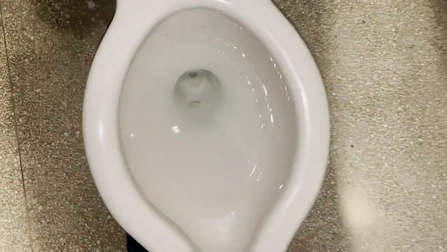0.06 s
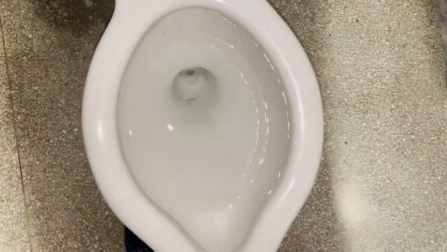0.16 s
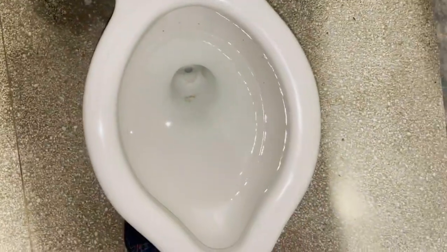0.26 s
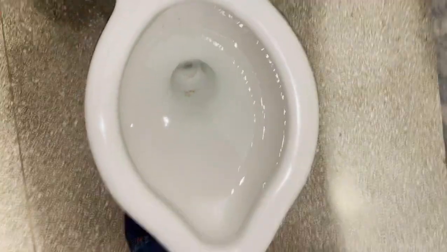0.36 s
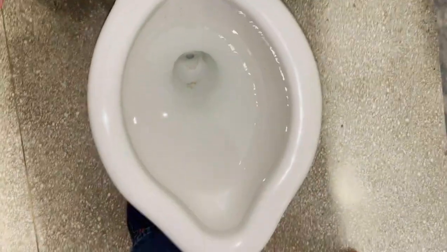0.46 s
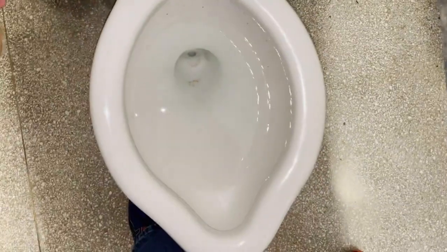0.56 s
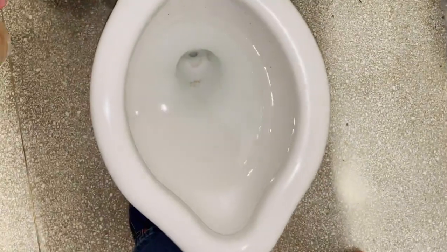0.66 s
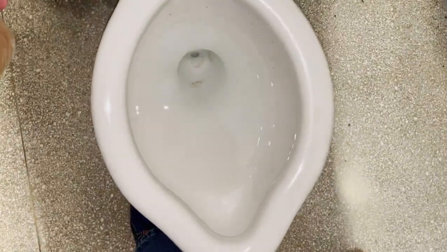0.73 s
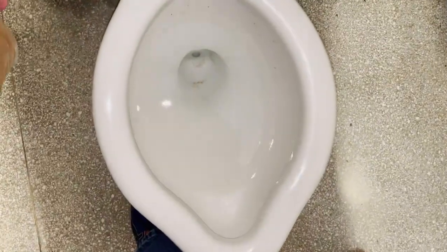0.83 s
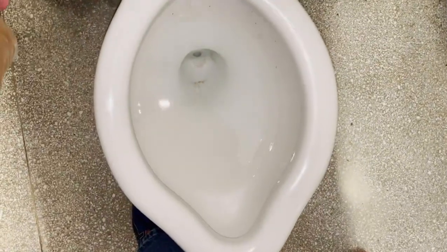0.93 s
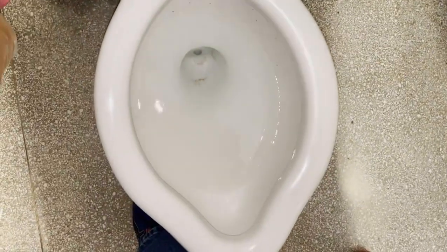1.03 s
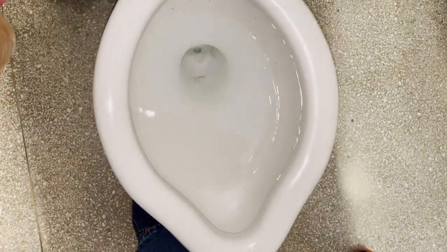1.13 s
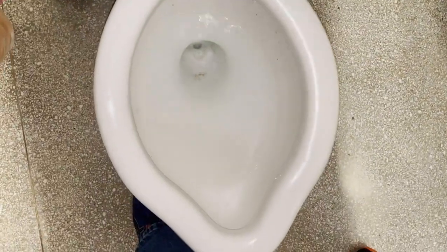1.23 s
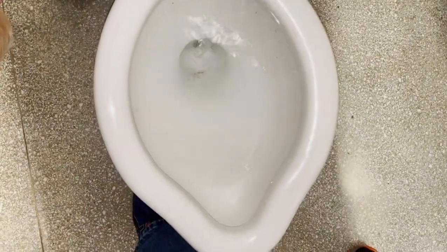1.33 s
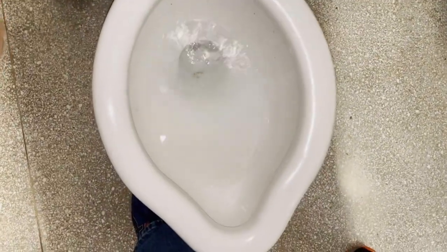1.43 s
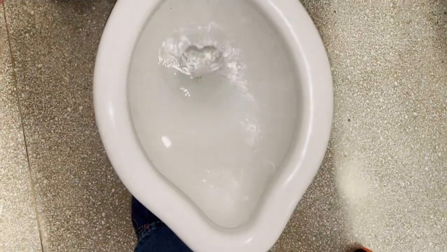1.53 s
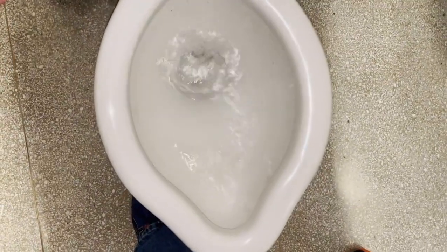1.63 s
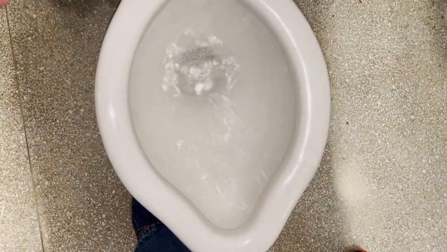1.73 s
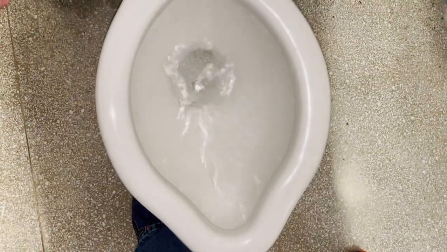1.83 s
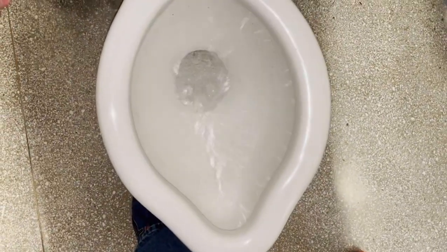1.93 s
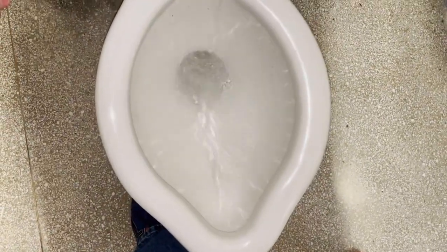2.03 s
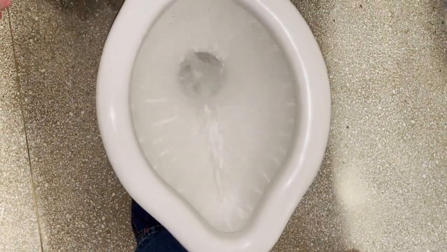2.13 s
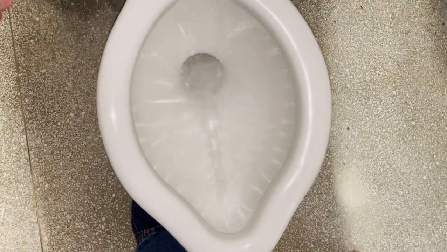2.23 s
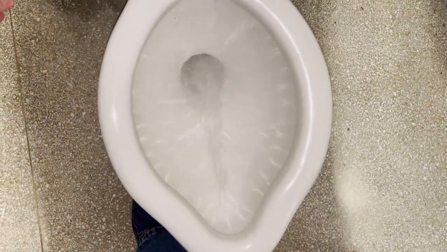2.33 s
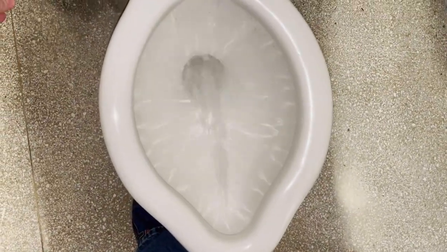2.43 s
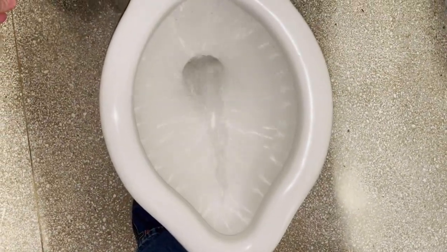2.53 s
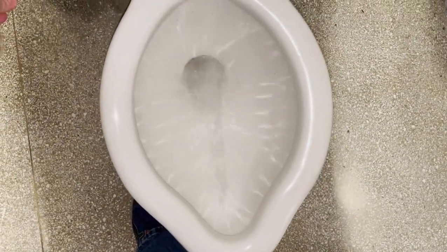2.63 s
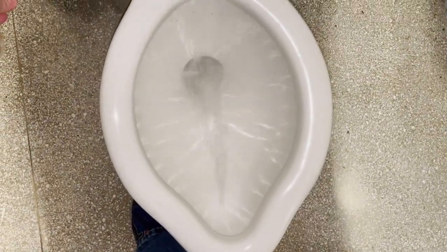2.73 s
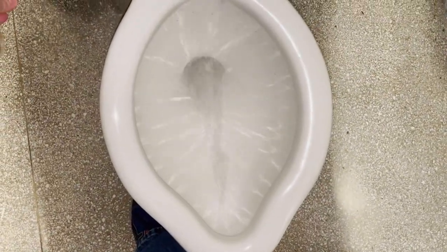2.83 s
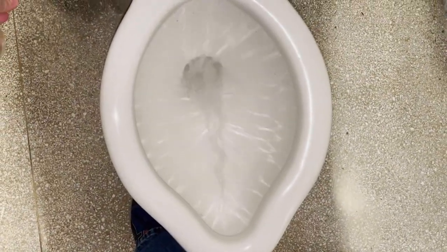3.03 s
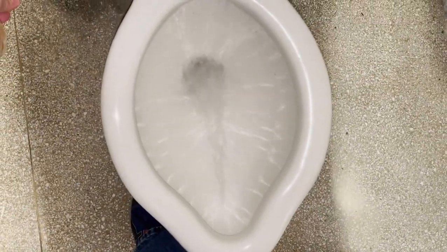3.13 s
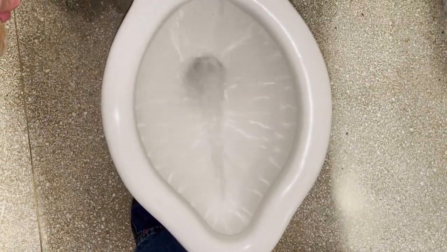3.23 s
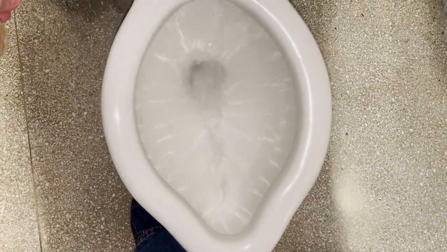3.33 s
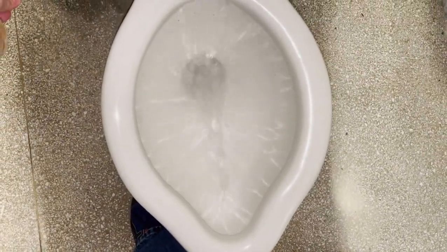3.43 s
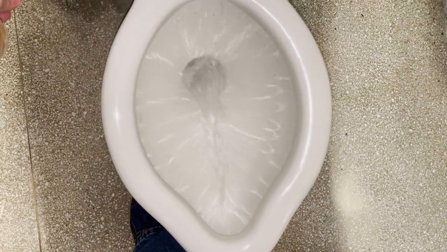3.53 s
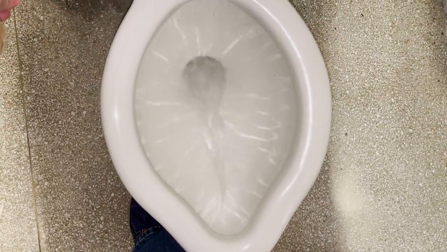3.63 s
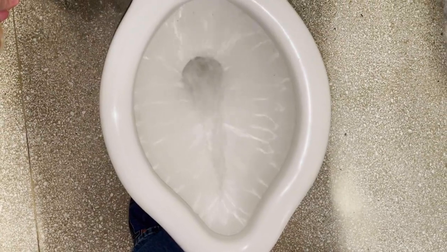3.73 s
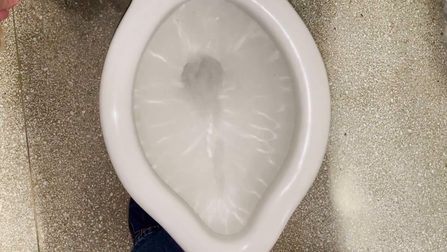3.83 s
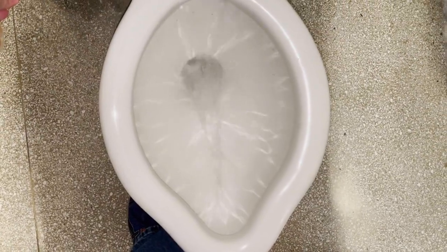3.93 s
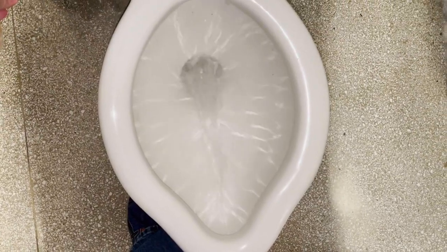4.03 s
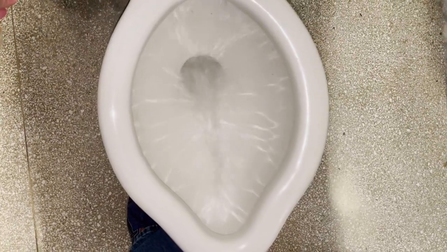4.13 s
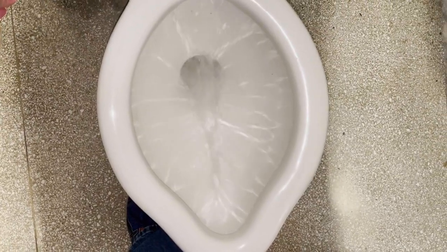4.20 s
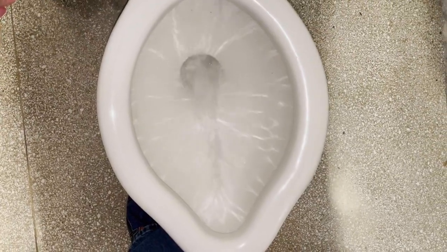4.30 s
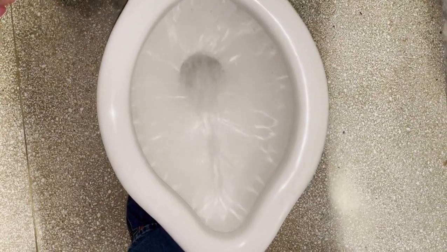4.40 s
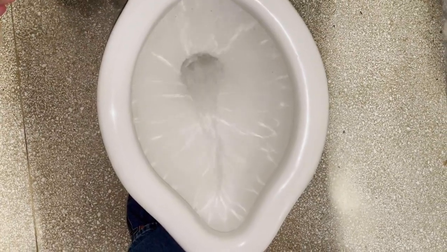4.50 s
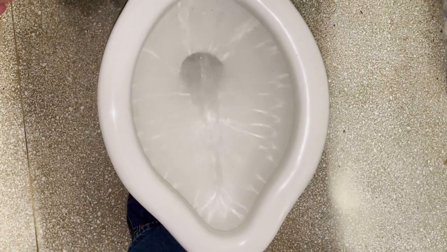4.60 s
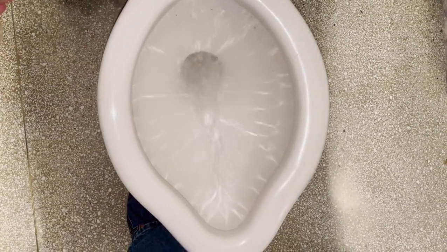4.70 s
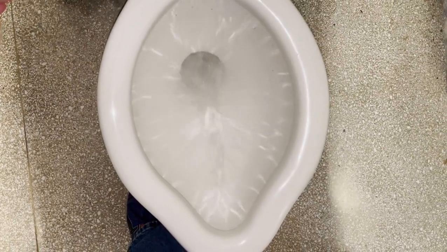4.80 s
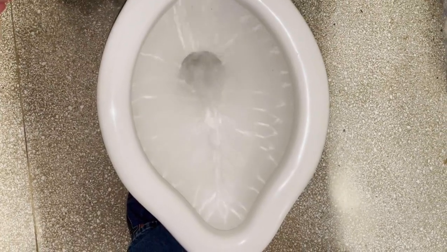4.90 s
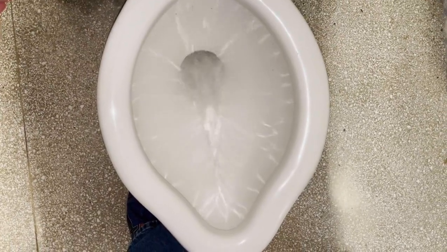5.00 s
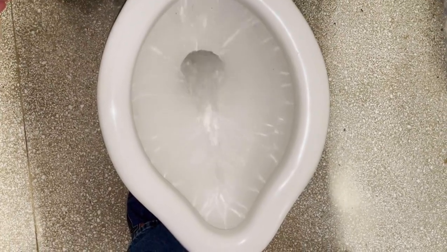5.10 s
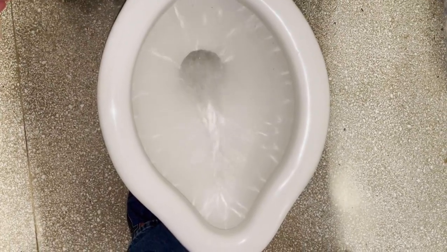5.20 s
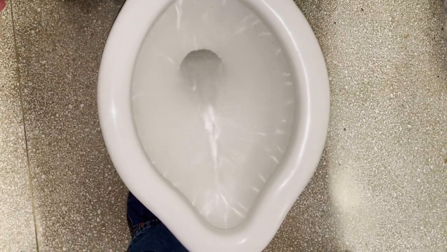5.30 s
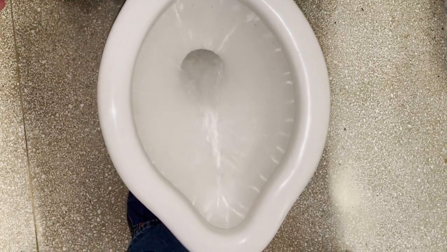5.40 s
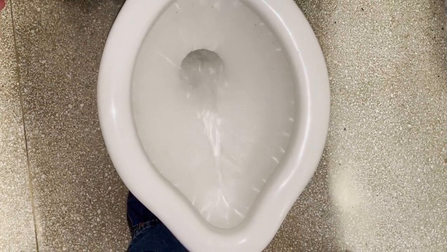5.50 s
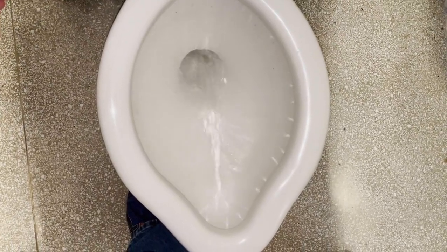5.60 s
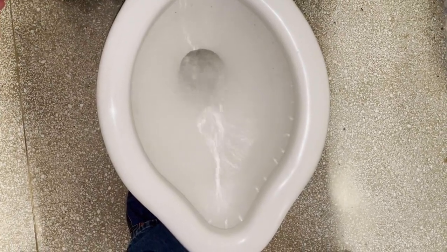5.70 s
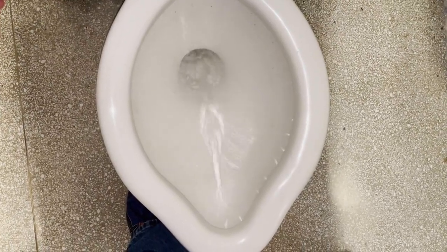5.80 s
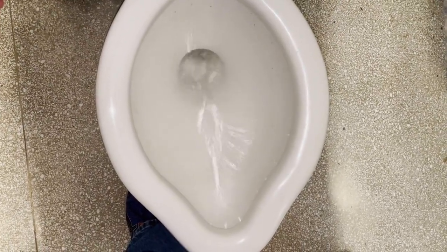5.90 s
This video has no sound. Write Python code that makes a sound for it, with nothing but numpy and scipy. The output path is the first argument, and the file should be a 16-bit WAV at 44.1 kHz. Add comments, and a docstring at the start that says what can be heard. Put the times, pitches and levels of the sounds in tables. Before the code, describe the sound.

Stereo pickup just over the bowl, with short, bright tiled reflections. Quiet air noise and soft knocking come first, then an abrupt roaring flush under a second in. Deep glugs, higher-pitched slurps and crackling spray peak around the middle, then ease into weaker gurgles and trickling as the valve closes.

```python
"""A pressure-fed toilet flushes in a small tiled restroom, heard from just above the bowl.
The siphon gurgles as damped bubbles ring the trap and bowl; its pitch climbs as the bowl empties, then sinks.
Air thumps as gliding tones, a faint narrow-band hiss fades, the valve opens with a hiss of shaped noise,
and the jet bursts into the bowl, a boom of resonant noise. Rim water splashes on the porcelain
as clouds of short bubbles and noise, then eases off. Faint ventilation noise lies under it all."""
import sys
import numpy as np
from scipy import signal
from scipy.fft import rfft, irfft, next_fast_len
from scipy.io import wavfile
from scipy.ndimage import map_coordinates

SR = 44100
rng = np.random.default_rng(int(sys.argv[2]) if len(sys.argv) > 2 else 0)


def pcm_store(signal):
    """Save signal as 16-bit PCM."""
    levels = np.round(np.clip(np.atleast_2d(signal), -1, 1) * 32767)
    wavfile.write(sys.argv[1], SR, levels.astype(np.int16).T)


N = 262395

# churn in the trap, slurp in the bowl: start_s, churn_db, slurp_db, typical bubble pitch_hz
SIPHON_COURSE = [(0.65, -44.5, -46, 434), (0.82, -48, -40, 394), (0.87, -28.5, -31.5, 376),
                 (1.45, -29.5, -34, 360), (1.8, -26, -30.5, 427), (2.15, -24.5, -24.5, 440),
                 (2.65, -25, -22.5, 548), (3.5, -31.5, -26.5, 590), (4.22, -31, -25.5, 760),
                 (4.42, -35, -31, 800), (5.15, -34.5, -33.5, 635), (5.95, -34, -43.5, 518)]
# resonances of the bowl: centre_hz, width_hz, level_db
BOWL_MODES = [(419, 73, -4), (444.4, 23.5, 3.5), (508, 31, -3.5), (555.7, 35, -1), (633.5, 78, -1.5),
              (722, 48, -2.5), (811, 93, -2), (880, 91, -19)]
# the valve cracks open, lets the jet burst through, then throttles down over CLOSING_S
OPEN_S, BURST_S, CLOSE_S, CLOSING_S = 0.62, 0.845, 5.49, 0.13
TOP_HZ = 15850  # upper band limit


def amp(db):
    """Decibels to gain."""
    return 10 ** (np.asarray(db) / 20)


def unit(x):
    """Scale to rms 1."""
    return x / np.sqrt(np.mean(x ** 2) + 1e-20)


def along(points, hz):
    """Interpolation on a logarithmic frequency axis through (frequency, value) points."""
    f, v = np.transpose(points)
    return np.interp(np.log(hz + 1), np.log(f + 1), v)


def curves(rows):
    """Linear interpolation in time: one value per sample for each column after the first."""
    s, *cols = np.transpose(rows)
    return [np.interp(np.arange(N) / SR, s, c) for c in cols]


def wobble(rate):
    """A smooth random modulation, interpolated through rate random knots a second."""
    knots = rng.standard_normal(int(N * rate / SR) + 4)
    return map_coordinates(knots, [np.arange(N) * rate / SR])


def since(s):
    """Seconds since time s, 0 before it."""
    return np.maximum(np.arange(N) / SR - s, 0)


def opened(start, rise):
    """A linear onset: 0 until start, then up to 1 over rise seconds."""
    return np.minimum(since(start) / rise, 1)


def surge(s, rise, decay):
    """A transient: a quick rise at time s, then exponential decay."""
    return opened(s, rise) * np.exp(-since(s + rise) / decay)


def add(track, s, sound):
    """Superposition: mix a sound into the track at time s."""
    start = max(round(s * SR), 0)
    track[start:start + len(sound)] += sound[:max(N - start, 0)]


def filtered(x, response):
    """Linear filtering: the spectrum of x times a complex response of frequency."""
    m = next_fast_len(N + SR // 2)
    return irfft(rfft(x, m) * response(np.fft.rfftfreq(m, 1 / SR)), m)[..., :N]


def coloured(x, spectrum):
    """Spectral shaping: x through the given spectrum, at rms 1."""
    return unit(filtered(x, lambda hz: amp(along(spectrum, hz))))


def resonate(x, modes, edge_hz):
    """Modal resonance: x through parallel damped modes, falling off above edge_hz, at rms 1."""
    def body(f):
        total = 0
        for k, (centre, width, db) in enumerate(modes):
            loss = 1j * f * width
            # neighbouring modes have opposite signs
            total = total + (-1) ** k * amp(db) * loss / (centre * centre - f * f + loss)
        return total
    damping = signal.butter(3, edge_hz, fs=SR, output="sos")
    return unit(signal.sosfilt(damping, filtered(x, body)))


def ring(t, hz, t60, glide, attack):
    """Damped oscillation of an air pocket whose pitch rises by the share glide over its t60."""
    life = t / t60
    tone = np.sin(2 * np.pi * hz * t * (1 + glide * np.minimum(life, 1) / 2))
    return tone * np.exp(-np.log(1000) * life) * (1 - np.exp(-t / attack))


def bubbles(count, pitch_hz, pitch_spread, cycles, size_db, glide, size):
    """Bubble acoustics: ringing pockets at random times, many weak and few strong, at rms 1."""
    chance = rng.random((count, 2))
    start = (chance[:, :1] * N).astype(int)
    detune = np.exp(pitch_spread * rng.standard_normal((count, 1)))
    hz = np.broadcast_to(pitch_hz, N)[start] * detune
    strength = amp(size_db * np.minimum(-np.log(1 - chance[:, 1:]), np.pi))
    k = np.arange(size)
    # each bubble lasts a fixed number of its own cycles, so high ones die sooner
    grains = strength * ring(k / SR, hz, cycles / hz, glide, .5 / hz)
    return unit(np.bincount((start + k).ravel(), grains.ravel(), N)[:N])


def porcelain(x):
    """Cavity resonance: x coloured by the upper resonances of the bowl, at rms 1."""
    # centre_hz, half_width_hz, boost_db
    cavity = [(1740, 30, 0.5), (2395, 37, -1), (2690, 46, 0.5), (2840, 90, 1), (3600, 89, 1.5),
              (3810, 140, 3.5), (4150, 92, 2.5), (4500, 58, -1), (5150, 180, 2.5), (6000, 130, 5),
              (6900, 180, 2), (7370, 110, 6.5), (8010, 120, 10.5)]

    def boost(f):
        return amp(sum(db * np.exp(-((f - hz) / width) ** 2) for hz, width, db in cavity))
    return unit(filtered(x, boost))


def around_bowl(x, side_db):
    """Partial decorrelation: drops land all round the bowl, so a part of x differs between channels."""
    side = amp(side_db) * np.roll(x, N // 2)
    return unit(x + np.array([[1], [-1]]) * side)


def swayed(x):
    """Frequency modulation by a moving boundary: the heaving water shifts the resonances in x."""
    sway_share, sway_per_s = .05, 7
    position = np.cumsum(1 + sway_share * wobble(sway_per_s))
    return map_coordinates(x, [position], order=1, mode="mirror")


def ventilation():
    """Broadband flow noise: random noise with a mostly low spectrum."""
    # spectrum of the ventilation: pitch_hz, level_db
    vent_spectrum = [(25, 2), (55, 0), (90, 5), (160, -11.5), (350, -11), (500, -18), (780, -21),
                     (1250, -26), (1600, -35), (2500, -31.5), (3400, -41), (5600, -42), (15000, -48)]
    return amp(-42.5) * coloured(rng.standard_normal(N), vent_spectrum)


def room_tail():
    """Diffuse reverberation: decaying noise, each band at its own rate, different in each channel."""
    # decay time per band: pitch_hz, t60_s
    decay_times = [(100, 0.13), (500, 0.54), (3000, 0.83), (14000, 0.022)]
    # level of the part that differs between channels; top treble is the same in both: pitch_hz, level_db
    differing_levels = [(80, -9), (300, -9.5), (600, -1), (1200, 0), (3000, -1), (5000, -6), (6500, 1),
                        (8600, -14.5), (12000, -2.5), (12900, 1.5), (13400, -50)]
    hz, t, z = signal.stft(rng.standard_normal((2, SR // 3)), SR, nperseg=256)
    early = amp(7.0) * np.exp(-t / 0.0027)
    decay = amp(-60 * t / along(decay_times, hz)[:, None]) + early
    decay = decay / np.sqrt(np.mean(decay ** 2, axis=1, keepdims=True))
    z = z * decay * amp(along(differing_levels, hz))[:, None]
    tail = signal.istft(z, SR, nperseg=256)[1] / np.sqrt(SR // 3)
    return np.pad(tail, ((0, 0), (SR // 500, 0)))  # starts 2 ms late


def room(x, size=4096):
    """Time-varying reverberation: the water keeps moving, so echo paths partly last, partly renew."""
    lasting = signal.fftconvolve(x[None], room_tail(), axes=1)[:, :N]
    moving = np.zeros((2, N + 2 * SR))
    padded = np.pad(x, (size, 2 * size))
    fade = np.sin(np.pi * np.arange(2 * size) / (2 * size))
    # overlapping pieces, each answered by a new tail
    for start in range(0, N + size, size):
        piece = padded[None, start:start + 2 * size] * fade
        answer = signal.fftconvolve(piece, room_tail(), axes=1)
        moving[:, start:start + answer.shape[1]] += answer
    return .25 * lasting + .97 * moving[:, size:size + N]


def early_hiss():
    """Narrow-band noise: a faint hiss at the start, which fades after 0.34 s."""
    # bands of the early hiss: centre_hz, width_hz, level_db
    early_modes = [(2160, 330, -4), (4770, 470, -5)]
    start_db, fade_start_s, fade_db_per_s = -62.5, 0.34, 107
    level = amp(start_db - fade_db_per_s * since(fade_start_s))
    return level * resonate(rng.standard_normal(N), early_modes, edge_hz=6500)


def air_thumps():
    """Pressure pulses: air in the pipe, and later gulps of the siphon, make dull thuds that drop in pitch."""
    # start_s, relative level_db, nominal pitch_hz (the glide runs from above it to below it)
    thumps = [(0.197, -24, 89), (0.241, -27, 105), (0.293, -26, 127), (0.309, -29, 170), (0.317, -25, 57),
              (0.345, -23, 90), (0.37, -18.5, 124.5), (0.385, -16, 75), (0.421, -14.5, 107),
              (0.446, -13.5, 138), (0.483, -13.5, 74.5), (0.52, -21, 78), (0.555, -13.5, 114),
              (0.625, -30, 115), (0.654, -23, 128), (0.677, -18.5, 91), (0.722, -21, 138), (0.74, -16, 82),
              (0.765, -16, 88), (0.797, -16, 125), (0.811, -15.5, 145), (1.865, -18, 80),
              (2.095, -17.5, 85), (2.184, -23, 78), (2.248, -12.5, 93), (2.406, -10.5, 94),
              (2.533, -17, 80), (2.609, -12.5, 100), (2.656, -13, 66)]
    out, t = np.zeros(N), np.arange(SR // 4) / SR
    for s, db, hz in thumps:
        drop_s = 0.0065 * np.exp(0.19 * rng.standard_normal())
        pitch_hz = hz * (0.54 + 1.77 * np.exp(-t / drop_s))
        swell = (1 - np.exp(-t / 0.0067)) * np.exp(-t / 0.01)
        add(out, s, amp(db + 7.5) * swell * np.sin(2 * np.pi * np.cumsum(pitch_hz) / SR))
    judder_db = wobble(300)
    return out * amp(judder_db)


def flow_db():
    """Throttling: the flow steps up in stages, holds, and drops as the valve narrows."""
    # the stages of opening: start_s, flow level_db
    opening = [(0.63, -16.5), (0.725, -13), (0.74, -8), (0.825, -7.5), (0.845, -3.5), (1.05, 2)]
    throttled_db = -5.5  # last flow relative to the held flow
    return curves(opening)[0] + throttled_db * opened(CLOSE_S, CLOSING_S)


def valve_ring():
    """Flow-excited resonance: the valve body rings in the flow, most while the opening is narrow."""
    # resonances of the valve body: centre_hz, width_hz, level_db
    body_modes = [(2240, 240, 2), (3830, 180, -2), (4190, 210, 8.5), (4470, 280, 10), (5180, 530, 4.5)]
    ring_db, wide_open_db = -35, -31  # narrow opening; its loss when wide open
    stroke = np.sin(np.pi * opened(BURST_S, CLOSE_S + CLOSING_S - BURST_S))
    running = opened(start=0.8, rise=0.17) * amp(ring_db + 1.1 * flow_db() + wide_open_db * stroke)
    return running * resonate(rng.standard_normal(N), body_modes, edge_hz=9600)


def valve():
    """Turbulence noise: water under pressure hisses through the valve and spits from the rim holes."""
    # spectrum of the hiss: pitch_hz, level_db
    hiss_spectrum = [(300, -2.5), (1500, -4.5), (2400, -5), (3200, -4), (4500, -0.5), (5650, -11.5),
                     (6500, -3.5), (8600, -2), (10500, -0.5), (13000, -4.5), (14500, -2.5), (15800, -12)]
    hiss_db = -32.5  # at a flow of 0 dB
    spits = rng.standard_normal(N) * amp(1.6 * wobble(700))
    hiss = porcelain(coloured(spits, hiss_spectrum))
    return amp(hiss_db + flow_db() + 0.32 * wobble(22.08)) * hiss


def drain():
    """Column resonance: the drain rumbles and lurches; the jet booms and briefly stifles the rumble."""
    # resonances of the drain: centre_hz, width_hz, level_db
    drain_modes = [(58, 27, -10), (83, 11.8, 6.5), (94.6, 20.4, -2), (140, 18, -5.5)]
    # resonances of the filled bowl: centre_hz, width_hz, level_db
    full_bowl_modes = [(149.6, 10, 2), (203, 35, -2), (368, 30, -3.5)]
    # the water column lurches: peak_s, level_db
    lurch_times = [(0.77, -21), (0.92, -40), (1.04, -23.5), (1.17, -28.5), (1.27, -32), (3.08, -35),
                   (4.53, -32), (4.78, -34)]
    lurch_width_s, rumble_db, boom_db = 0.071, -38, -17.5  # rumble at average churn
    churn_db, _, _ = curves(SIPHON_COURSE)
    steady = amp(rumble_db + churn_db - churn_db.mean())
    t = np.arange(N) / SR
    lurches = sum(amp(db) * np.exp(-((t - s) / lurch_width_s) ** 2) for s, db in lurch_times)
    rumble = resonate(rng.standard_normal(N), drain_modes, edge_hz=204)
    boom = resonate(rng.standard_normal(N), full_bowl_modes, edge_hz=340)
    jet = surge(BURST_S, rise=0.015, decay=0.2)
    rumble_gain = np.hypot(steady * amp(-12 * jet), lurches)
    boom_gain = np.hypot(amp(boom_db) * jet, amp(-10.5) * steady)
    return rumble_gain * rumble + boom_gain * boom


def jet_slap():
    """Impact excitation: the first rush of the jet strikes the porcelain and rings the bowl."""
    slap = surge(BURST_S, rise=0.0073, decay=0.35)
    return amp(-30) * slap * resonate(rng.standard_normal(N), BOWL_MODES, edge_hz=330)


def splash():
    """Droplet impact and bubble ringing: rim water sloshes and breaks into crackling spray."""
    # rim water landing on the bared porcelain: start_s, spray_db, slosh_db
    splash_course = [(0.73, -44, -48), (0.83, -44, -54), (0.87, -40, -37.5), (1.15, -42.5, -48),
                     (1.5, -42, -44.5), (1.65, -33.5, -43.5), (1.98, -30.5, -37.5), (2.17, -27, -33),
                     (2.9, -30.5, -34), (3.5, -32.5, -36), (4.6, -35, -34.5), (5.2, -33, -35.5),
                     (5.95, -43, -42.5)]
    # spectrum of the spray: pitch_hz, level_db
    spray_spectrum = [(700, -30), (1400, -7.5), (1750, -0.5), (2050, -3), (2700, 1.5), (3800, 3),
                      (5000, 4.5), (5650, 2.5), (7000, 0), (10000, 11), (15800, -45)]
    # resonances under the rim: centre_hz, width_hz, level_db
    rim_modes = [(770, 210, -11.5), (994, 160, -4.5), (1063, 165, -2), (1192, 87, 2), (1284, 218, -4),
                 (1755, 100, -5.5)]
    spray_db, slosh_db = curves(splash_course)
    flutter = wobble(28.03)
    drops = bubbles(count=9000, pitch_hz=2920, pitch_spread=0.46, cycles=2.9, size_db=2.0,
                    glide=0.083, size=200)
    fizz = bubbles(count=1800, pitch_hz=2571, pitch_spread=0.403, cycles=118, size_db=3.5,
                   glide=0.13, size=1200)
    plinks = bubbles(count=700, pitch_hz=2317, pitch_spread=0.36, cycles=43, size_db=1.5,
                     glide=0.12, size=900)
    mist = rng.standard_normal(N)
    mixture = drops + amp(-4.0) * fizz + amp(-5) * plinks + amp(-4.5) * mist
    spray = porcelain(coloured(mixture, spray_spectrum))
    lumps = bubbles(count=2800, pitch_hz=1179, pitch_spread=0.38, cycles=22.0, size_db=2.5,
                    glide=0.1, size=750)
    slosh = resonate(lumps, rim_modes, edge_hz=2200)
    return (amp(spray_db + 1.52 * flutter) * around_bowl(spray, side_db=-13)
            + amp(slosh_db + 0.44 * wobble(20)) * around_bowl(slosh, side_db=-6))


def spurts():
    """Band-limited noise bursts: single spurts of water slap the bowl, and the valve spits brief high hisses,
    each burst in its own band."""
    # start_s, level_db, centre_hz, swell_s
    bursts = [(0.650, -46, 12000, .009), (0.652, -57, 4500, .009), (0.698, -41, 12000, 0.0086),
              (0.733, -44, 4000, .008), (0.835, -38, 11000, .012), (0.851, -40, 1150, 0.0079),
              (0.88, -41, 1200, .009), (0.882, -39.5, 2700, .008), (1.244, -30.5, 1220, 0.0073),
              (1.63, -36, 1300, 0.0056), (1.767, -36, 1300, .005), (2.135, -26.5, 5760, .012),
              (2.136, -32, 12000, .012), (2.22, -29, 1250, 0.0044), (2.252, -37, 1250, 0.0064),
              (2.283, -31, 1250, 0.0061), (2.363, -23.5, 2860, 0.0044), (2.61, -32, 12000, .015),
              (2.624, -27, 3000, .006), (2.674, -36, 3000, 0.0046), (2.779, -30, 6000, 0.0037),
              (2.868, -30, 1250, 0.0024), (2.89, -29.5, 3200, 0.0085), (2.915, -30, 3000, 0.0065),
              (3.168, -29, 4200, .006), (3.238, -31, 3000, .007), (3.574, -30, 3440, 0.0036),
              (3.629, -36, 1290, 0.0091), (3.742, -28, 1200, .006), (3.788, -30, 1310, 0.0053),
              (3.80, -30, 3000, 0.013), (4.046, -28, 6000, .004), (4.057, -26, 3200, 0.0057),
              (4.087, -31, 3200, .005), (4.212, -36.5, 1130, 0.0078), (4.226, -28, 3420, .005),
              (4.252, -30, 3300, .004), (4.279, -28.5, 1350, 0.0056), (4.40, -30, 6000, .004),
              (4.557, -33.5, 1200, .005), (4.56, -32, 3200, 0.0045), (4.606, -32, 1200, 0.0056),
              (4.661, -30, 3700, 0.0037), (4.733, -37, 1300, 0.0082), (5.027, -30, 1300, .008),
              (5.055, -32, 1400, .007), (5.106, -30.5, 1800, .009), (5.451, -31, 1200, .005)]
    width_octaves = 0.83
    out, t = np.zeros(N), np.arange(SR // 8) / SR
    for s, db, hz, swell in bursts:
        edges = np.minimum(hz * 2 ** (width_octaves * np.array([-.5, .5])), TOP_HZ)
        band = signal.butter(2, edges, "bandpass", fs=SR, output="sos")
        drops = unit(signal.sosfilt(band, rng.standard_normal(len(t))))
        add(out, s, amp(db) * drops * t / swell * np.exp(1 - t / swell))
    return out


def squeezed_pockets():
    """Stiffness of trapped air: pitch rises as the jet squeezes a pocket and falls as it lets go."""
    # pockets held in the trap: start_s, length_s, level_db, first_hz, last_hz (before the waver)
    squeezes = [(0.884, 0.057, -11.5, 254, 332), (0.972, 0.046, -28.5, 726, 527),
                (1.029, 0.047, -14.5, 253, 342), (1.07, 0.07, -24.5, 314, 260),
                (1.124, 0.065, -16.5, 352, 390), (1.186, 0.111, -22.5, 330, 436),
                (1.285, 0.058, -18.5, 333, 273), (1.331, .05, -27.5, 455, 400)]
    out, waver = np.zeros(N), 1 + 0.027 * wobble(90)
    for s, length, db, first_hz, last_hz in squeezes:
        life = np.linspace(0, 1, round(length * SR))
        pitch_hz = (first_hz + (last_hz - first_hz) * life) * waver[round(s * SR):][:len(life)]
        add(out, s, amp(db) * np.sin(np.pi * life) * np.sin(2 * np.pi * np.cumsum(pitch_hz) / SR))
    return out


def glugs():
    """Bubble resonance: each gulped air pocket rings with rising pitch and sheds a burst of froth."""
    # start_s, relative level_db, first pitch_hz, t60_s
    gulps = [(0.650, -29, 446, 0.055), (0.753, -17.5, 440, 0.092), (0.853, 0, 285, .14),
             (0.855, -3.5, 186, 0.117), (0.865, -0.5, 330, 0.1), (0.886, -5, 215, 0.059),
             (0.897, -13, 516, 0.087), (1.031, -3.5, 288, 0.089), (1.032, -2, 394.4, 0.12),
             (1.118, -13.5, 198, .11), (1.888, -7, 293, 0.11), (2.088, -4.5, 434, 0.17),
             (2.140, -6.5, 601, 0.12), (2.185, -4.5, 278, 0.074), (2.229, -6, 283, 0.14),
             (2.254, -8, 291, 0.13), (2.341, -1, 428, 0.053), (2.341, -6, 610, 0.065),
             (2.395, -5, 650, 0.072), (2.397, -10, 810, 0.06), (2.480, -11, 288, 0.21),
             (2.541, -10, 306, 0.1), (2.636, -6.5, 492, 0.073), (2.683, -5, 430, 0.12),
             (2.700, -5.5, 580, 0.065), (2.822, 1.5, 596, 0.052), (2.840, 0.5, 582, 0.061),
             (2.994, -9, 441, 0.085), (3.006, -5.5, 603, 0.12), (3.064, -13, 1046, 0.054),
             (3.148, -7.5, 436, 0.06), (3.319, -10, 280, 0.049), (3.337, -7.5, 611, 0.12),
             (3.359, -6.5, 442, 0.14), (3.360, -4, 608, 0.11), (3.396, -6, 592, 0.071),
             (3.420, -11.5, 428, 0.12), (3.548, -11, 557, 0.1), (3.588, -7, 437, 0.088),
             (3.616, -7.5, 587, 0.043), (3.686, -6, 648, 0.069), (3.707, -7, 598, 0.068),
             (3.728, -5, 634, 0.082), (3.743, -11, 825, 0.06), (3.842, -8, 442, 0.08),
             (3.916, -11, 430, 0.074), (3.919, -7.5, 633, 0.1), (3.957, -7.5, 567, 0.086),
             (3.990, -19, 830, 0.054), (4.001, -11, 1060, 0.057), (4.019, -3, 743, 0.057),
             (4.191, -2.5, 568, 0.071), (4.210, -7.5, 855, 0.055), (4.218, -10, 563, 0.11),
             (4.300, -13, 633, 0.085), (4.316, -9.5, 628, 0.047), (4.368, -16, 378, .07),
             (4.450, -13, 776, 0.078), (4.564, -15, 765, 0.082), (4.703, -15, 288, 0.1),
             (4.755, -20, 1880, .04), (4.757, -21, 2470, 0.043), (4.770, -12.5, 610, 0.086),
             (4.885, -16.5, 288, 0.083), (4.931, -15.5, 285, 0.082), (5.022, -15.5, 610, 0.068),
             (5.030, -24, 1510, 0.044), (5.053, -14, 860, 0.056), (5.123, -16, 285, .09),
             (5.172, -15, 450, 0.087), (5.188, -20, 288, 0.2), (5.229, -16, 293, 0.076),
             (5.310, -14.5, 1135, 0.062), (5.314, -16, 274, 0.072), (5.412, -16, 600, 0.07),
             (5.562, -21, 1770, .05), (5.642, -13.5, 236, 0.089), (5.767, -11, 293, 0.17),
             (5.783, -20, 1054, .05), (5.872, -16.5, 432, 0.09)]
    froth_db = -15  # relative to the pocket
    out, t = np.zeros(N), np.arange(SR // 4) / SR
    for s, db, hz, t60 in gulps:
        pocket = ring(t, hz, t60, glide=0.13, attack=0.0015)
        band = signal.butter(3, [hz * .5, hz * 1.5], "bandpass", fs=SR, output="sos")
        froth = unit(signal.sosfilt(band, rng.standard_normal(len(t)))) * np.exp(-t / 0.016)
        add(out, s, amp(db - 5.0) * (pocket + amp(froth_db) * froth))
    return out


def siphon():
    """Bubbles driving resonators: large ones churn in the trap, smaller ones slurp in the bowl."""
    # resonances of the trap: centre_hz, width_hz, level_db
    trap_modes = [(213.5, 38, -9), (255.7, 32.5, -4.5), (297.7, 28, 0.5), (370.6, 26, -2.5)]
    churn_db, slurp_db, pitch_hz = curves(SIPHON_COURSE)
    large = bubbles(count=3000, pitch_hz=190 + .2 * pitch_hz, pitch_spread=0.31, cycles=10.3,
                    size_db=1.2, glide=0.27, size=1400)
    small = bubbles(count=3200, pitch_hz=pitch_hz, pitch_spread=0.38, cycles=9.6,
                    size_db=2.5, glide=0.063, size=950)
    churn = swayed(resonate(large, trap_modes, edge_hz=360))
    slurp = swayed(resonate(small, BOWL_MODES, edge_hz=870))
    # the cloud of air that the jet drives in
    cloud = amp(-16.5) * surge(BURST_S, rise=0.0065, decay=0.12)
    return np.hypot(amp(churn_db), cloud) * churn + amp(slurp_db) * slurp


def scene():
    """Superposition of direct and reverberant sound: the valve opens, rim water follows a moment later."""
    flow = opened(OPEN_S, rise=0.033) * (valve() + siphon() + drain() + jet_slap())
    rim = opened(start=.732, rise=.008) * splash()
    knocks = air_thumps() + glugs() + squeezed_pockets() + spurts()
    steady = flow + valve_ring() + early_hiss() + ventilation()
    room_send = steady + rim.mean(axis=0) + amp(-1.5) * knocks
    return steady + rim + knocks + room(room_send)


def record(dry):
    """Stereo pickup: the two channels differ in level and phase; a low cut and a band limit."""
    # phase by which the right channel leads: pitch_hz, lead_rad
    channel_phase = [(200, 0), (1000, -1), (1400, -1.2), (1520, 1.8), (2100, .2), (3000, -1.1), (5300, -1),
                     (5700, 1.2), (6800, .8), (7400, 2.5), (8600, 3.14), (10500, 4.3), (13200, 6.28)]
    # left minus right: pitch_hz, level_db
    channel_balance = [(60, 0.5), (130, 2), (290, 3), (640, 3.8), (1410, 3.8), (3100, 2.5), (5000, 1.8),
                       (7500, 0)]
    sides = np.array([[1], [-1]]) / 2

    def channels(hz):
        gain = amp(sides * along(channel_balance, hz))
        turn = np.exp(-1j * sides * along(channel_phase, hz))
        return gain * turn * (hz < TOP_HZ)
    low_cut = signal.butter(3, 38, "highpass", fs=SR, output="sos")
    return filtered(signal.sosfilt(low_cut, dry), channels)


dry = scene()
out = record(dry)
pcm_store(out)
```